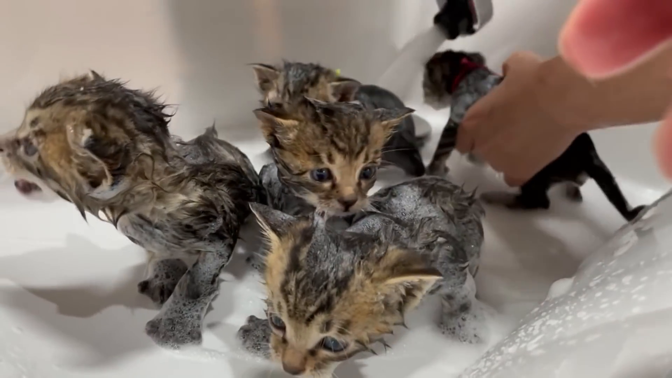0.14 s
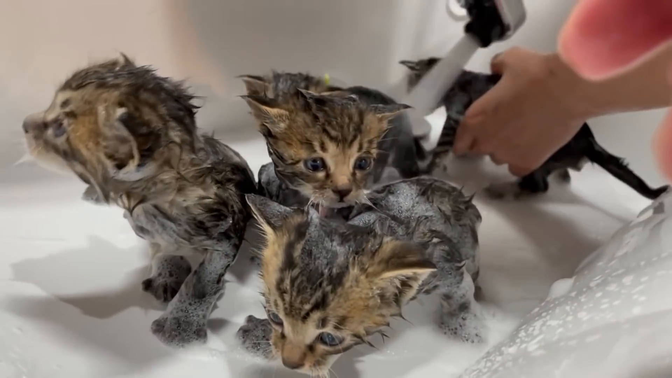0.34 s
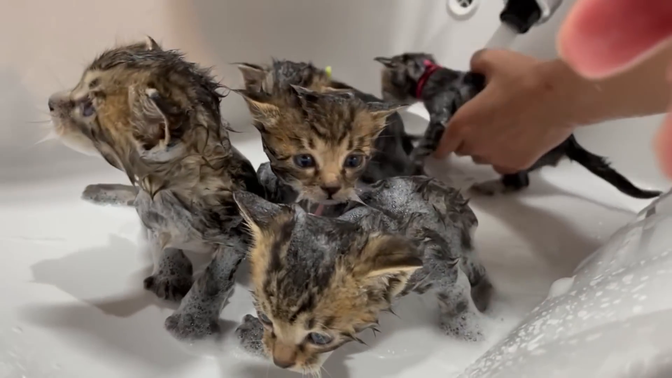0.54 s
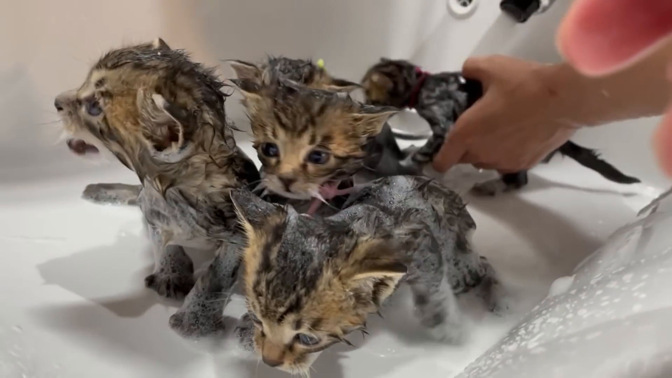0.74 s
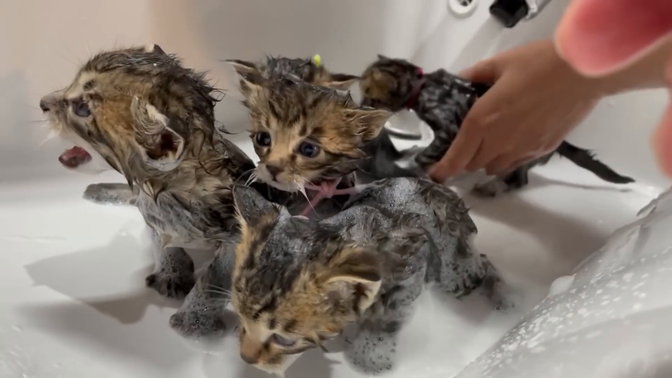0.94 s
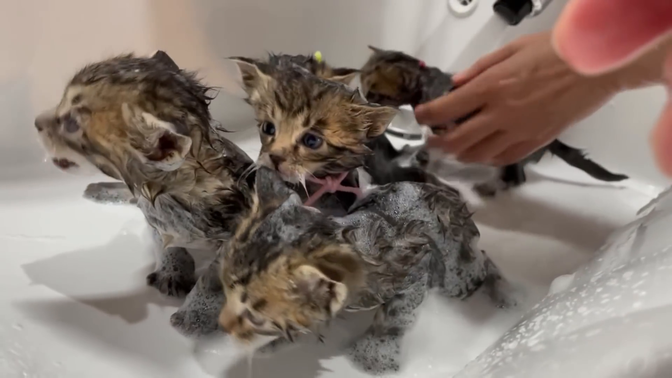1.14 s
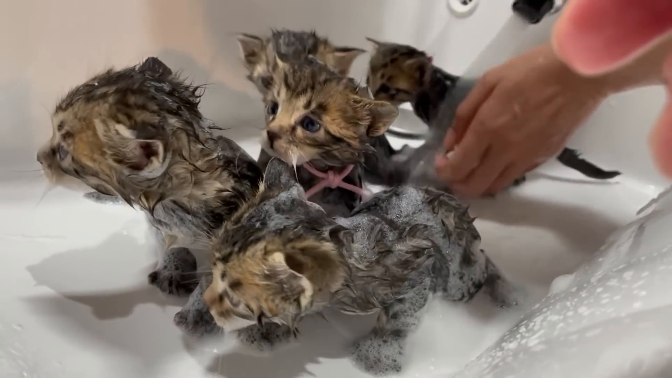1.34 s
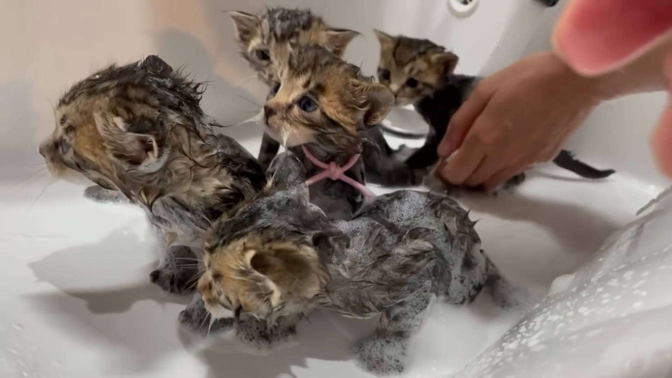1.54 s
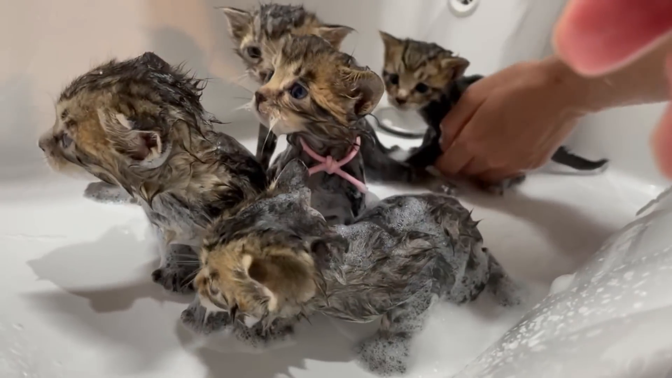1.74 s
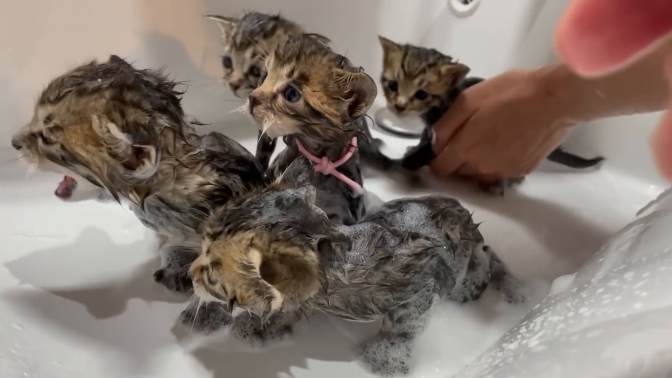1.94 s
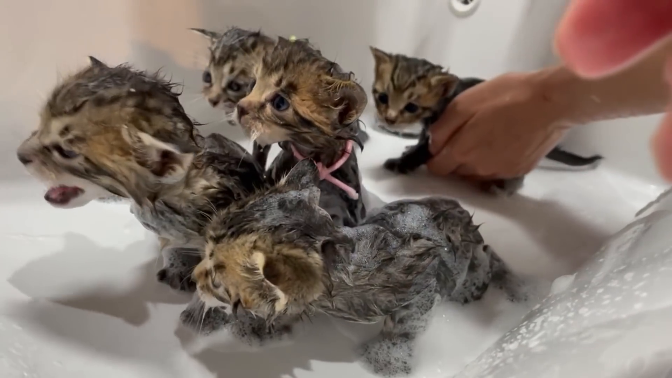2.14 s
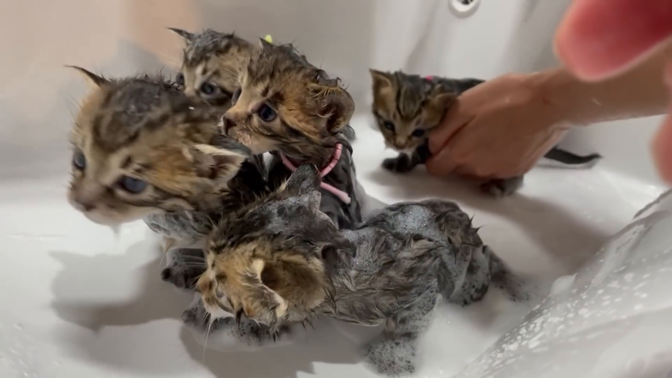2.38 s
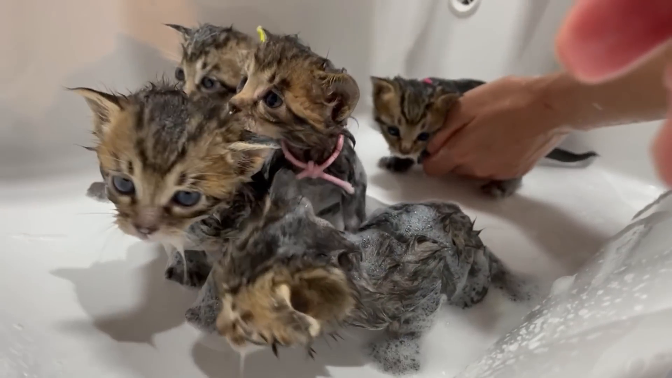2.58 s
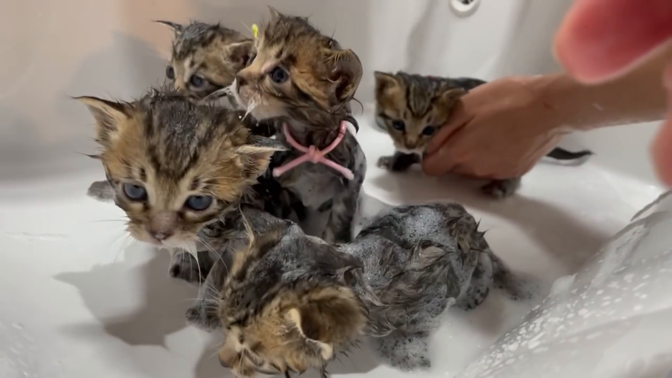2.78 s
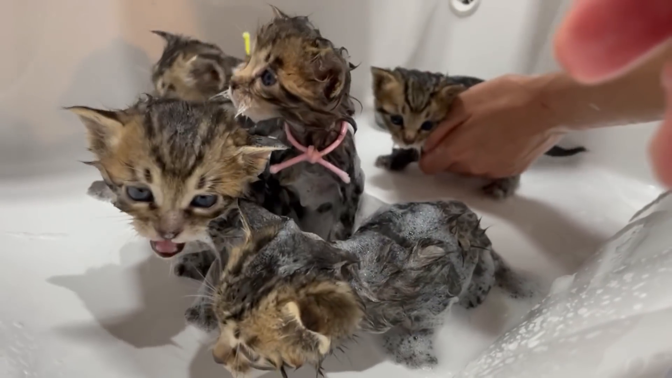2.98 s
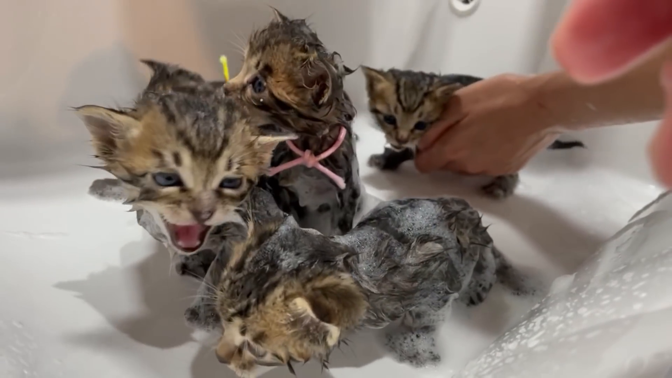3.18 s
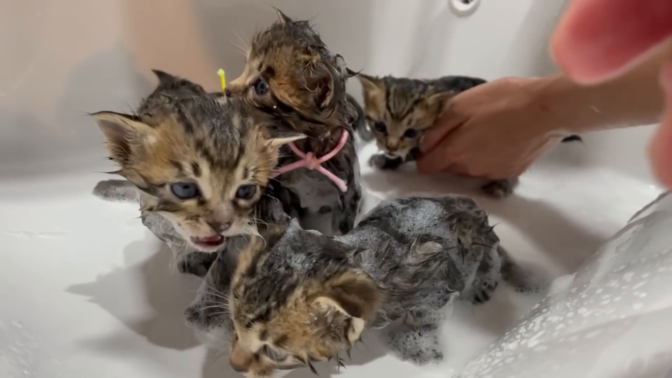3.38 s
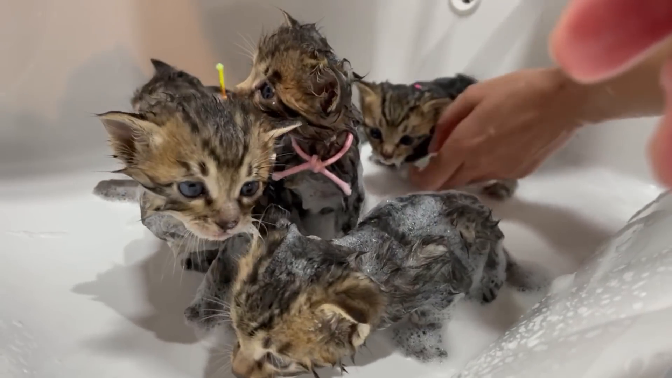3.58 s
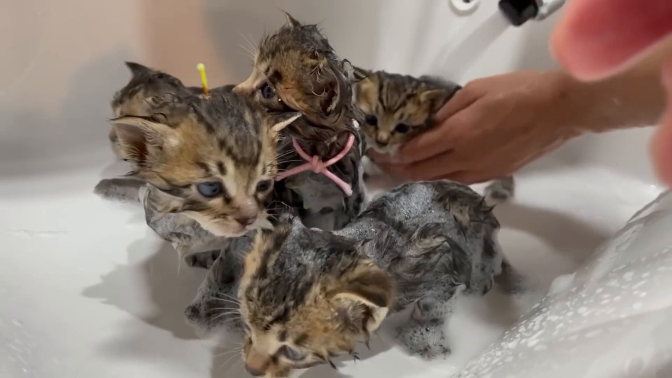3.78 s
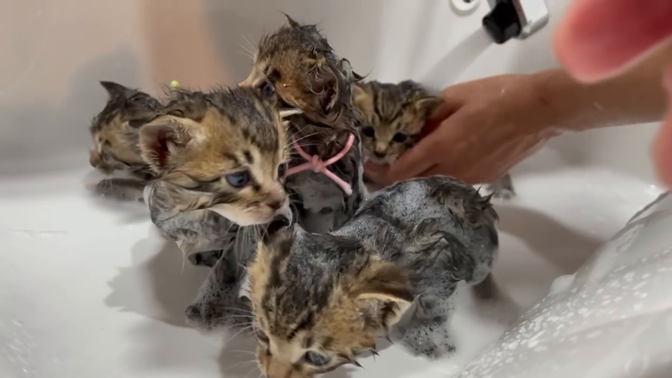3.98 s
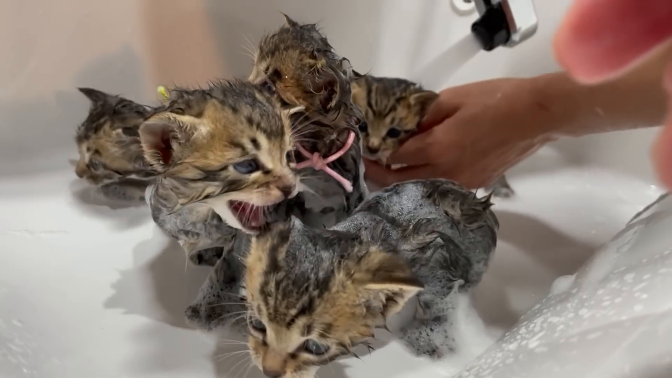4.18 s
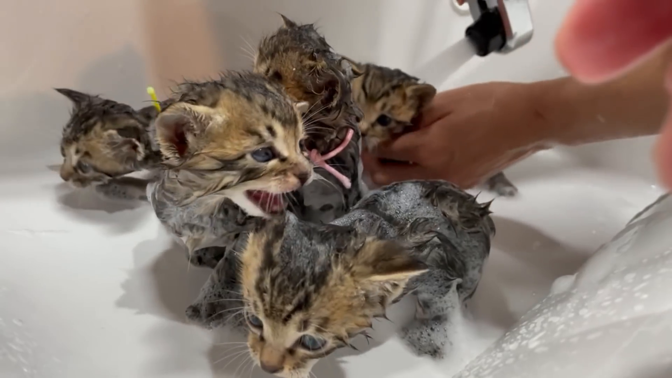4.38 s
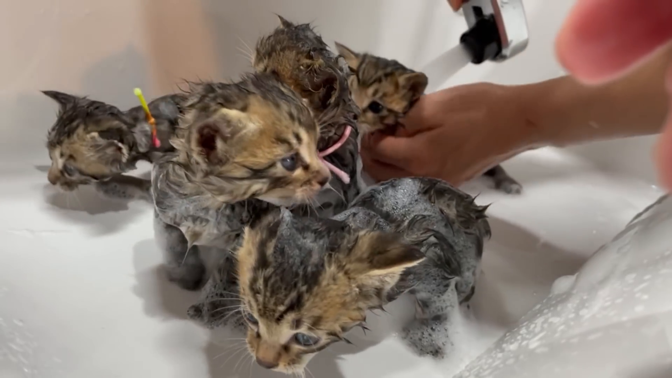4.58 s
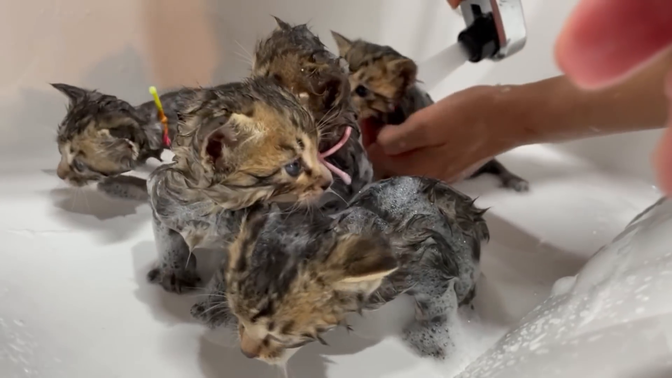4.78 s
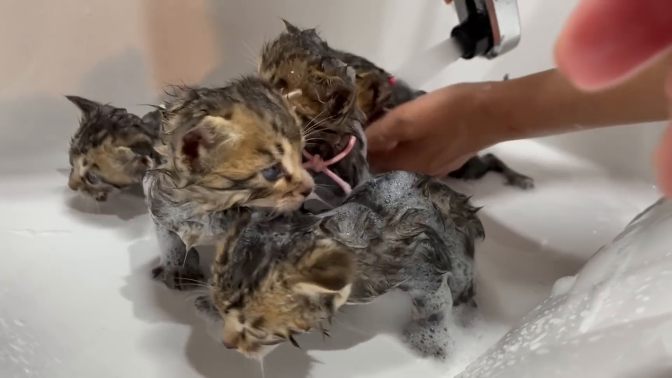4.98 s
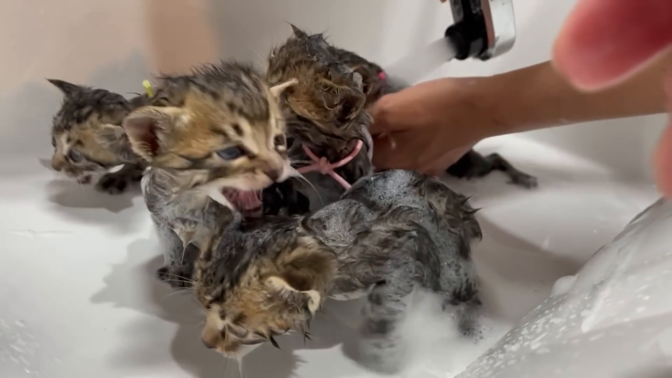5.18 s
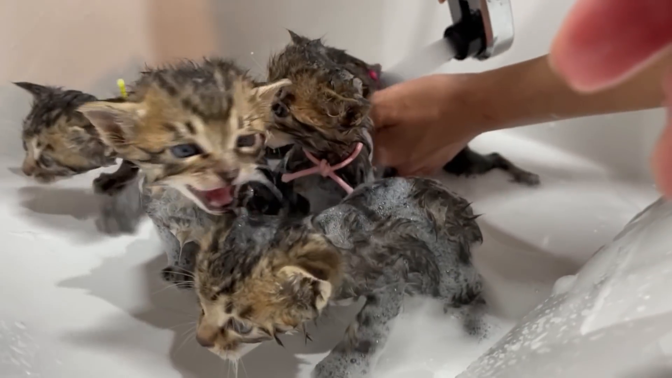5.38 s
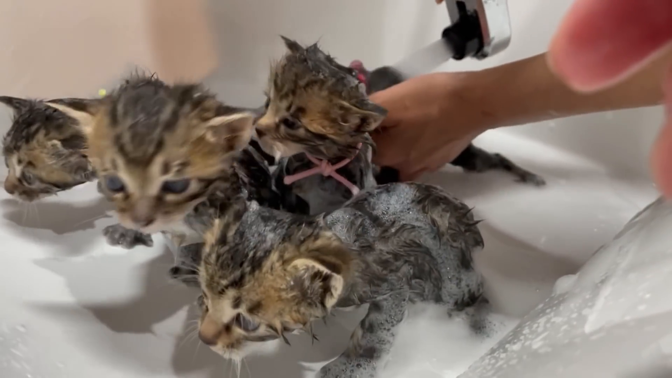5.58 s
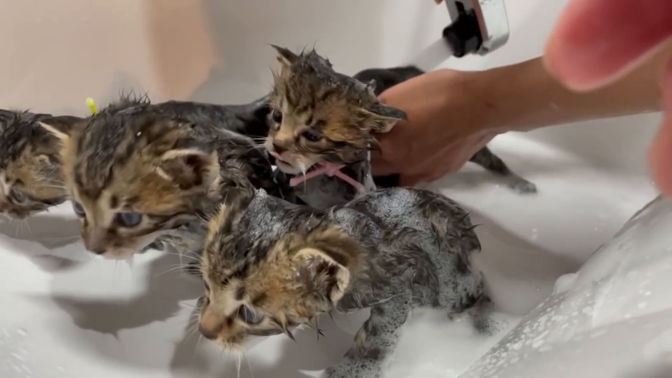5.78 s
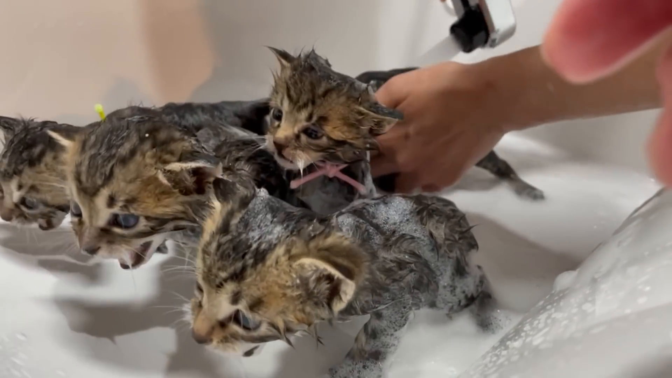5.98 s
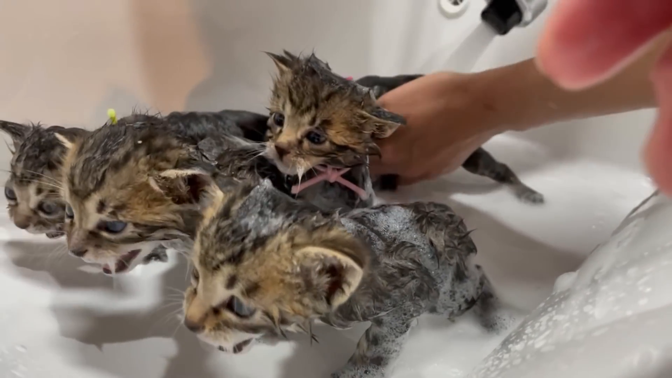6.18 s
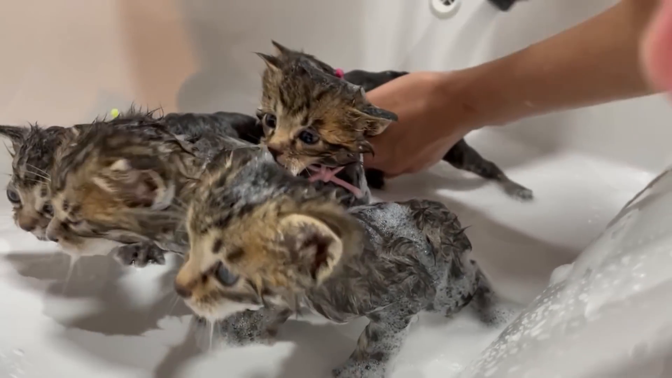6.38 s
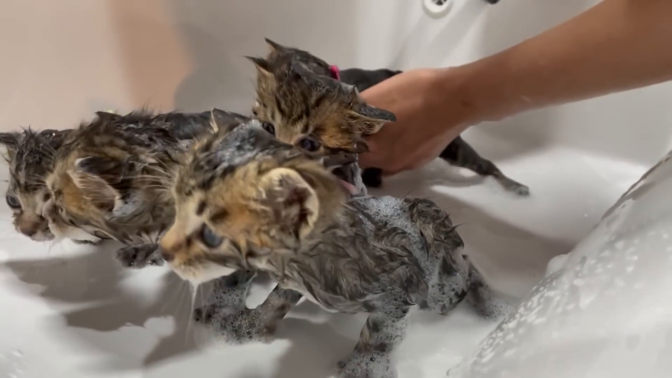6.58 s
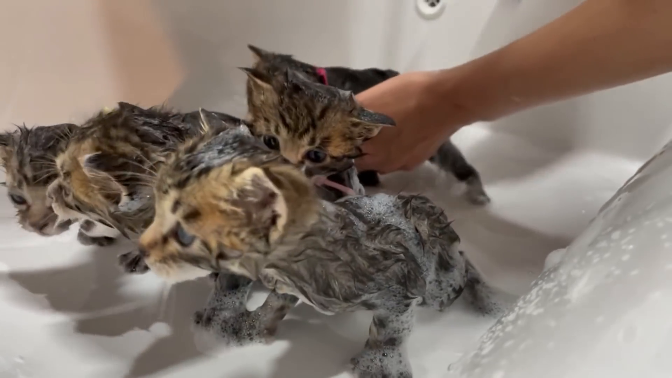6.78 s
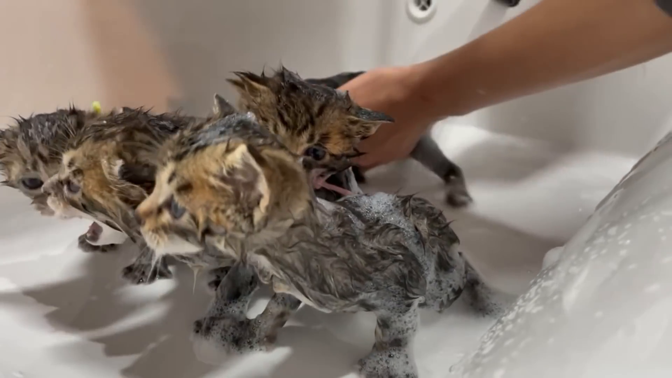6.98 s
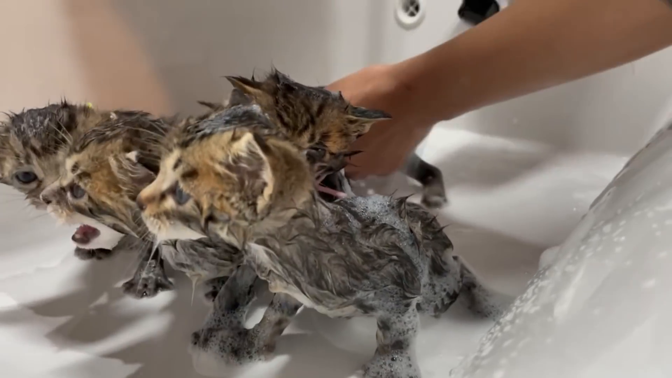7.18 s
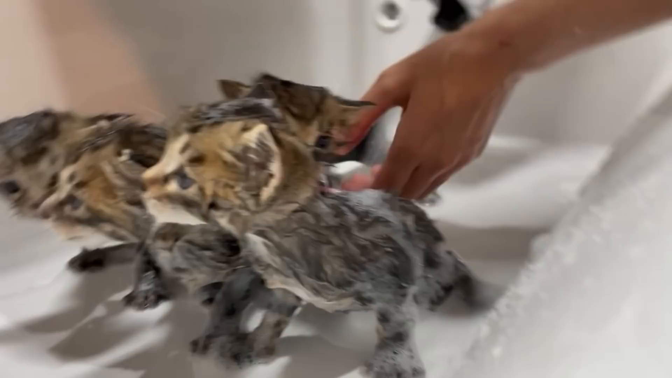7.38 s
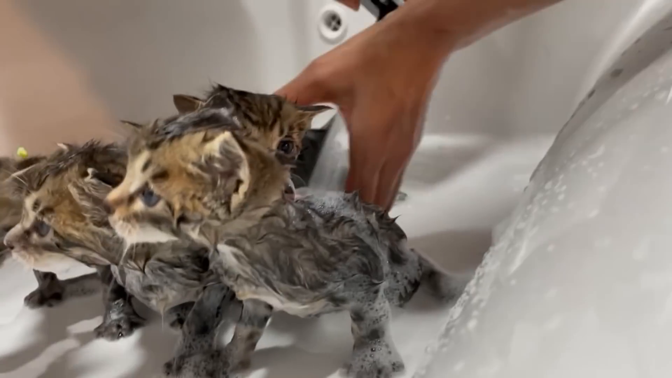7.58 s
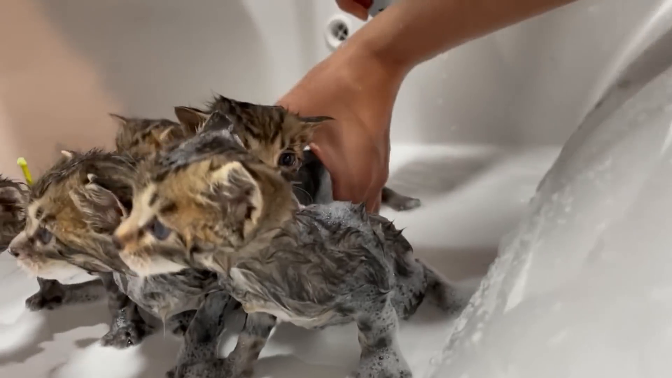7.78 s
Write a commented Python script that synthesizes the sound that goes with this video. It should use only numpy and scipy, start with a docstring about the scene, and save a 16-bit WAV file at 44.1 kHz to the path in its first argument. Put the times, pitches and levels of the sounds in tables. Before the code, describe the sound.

In a small bathroom, thin piercing kitten voices overlap: pure soft whines, brighter open-mouthed mews and four harsh yells with raspy strain and a breaking finish. The cries sit near and slightly left, with weak tub reflections. Quiet swishes of wet fur and tiny paw squishes appear in gaps, over low room air, unsteady hum and light microphone hiss. The final mew gives way to near quiet.

```python
"""In a bathroom, wet kittens cry over one another while they are washed in a tub, close to a hand-held microphone.
Whines and mews are arches of pitch: whines are nearly pure, mews brighten as their overtones swell.
Yells follow drawn courses of pitch and harmonics and break near the end; strained cries split into a rasp.
Weak echoes from the tub walls and a short room tail answer; shaped noise makes wet fur, paws, air and hiss.
Narrow, unsteady bands make the hum."""
import sys
import numpy as np
from scipy import signal
from scipy.fft import rfft, irfft, next_fast_len
from scipy.io import wavfile
from scipy.ndimage import uniform_filter1d, map_coordinates

SR = 44100
rng = np.random.default_rng(int(sys.argv[2]) if len(sys.argv) > 2 else 0)


def waveform_to_disk(signal):
    """Save audio, clipped to [-1, 1], as 16-bit WAV at the path in sys.argv[1]."""
    frames = np.transpose(np.atleast_2d(signal))
    scaled = np.clip(frames, -1, 1) * 32767
    samples = np.round(scaled).astype(np.int16)
    wavfile.write(sys.argv[1], SR, samples)


N = 346185  # length [samples]
TOP_HZ = 15800  # band limit of the harmonics and of the final mix


def amp(db):
    """Amplitude factor of a level in dB."""
    return 10 ** (np.asarray(db) / 20)


def unit(x):
    """x scaled to rms 1."""
    return x / np.sqrt(np.mean(abs(x) ** 2) + 1e-20)


def along(points, hz):
    """Curve of (frequency [Hz], value) points, read on a log frequency axis."""
    f, v = np.transpose(points)
    return np.interp(np.log(hz + 1), np.log(f + 1), v)


def wobble(rate, size):
    """Smooth random curve with rate knots a second."""
    knots = rng.standard_normal(int(size * rate / SR) + 4)
    return map_coordinates(knots, [np.arange(size) * rate / SR])


def flutter(rate, size):
    """Random unsteadiness of both strength and phase, as a complex curve of rms 1."""
    return unit(wobble(rate, size) + 1j * wobble(rate, size))


def filtered(x, response):
    """x shaped by a response of frequency."""
    m = next_fast_len(x.shape[-1] + 8192)
    spectrum = rfft(x, m) * response(np.fft.rfftfreq(m, 1 / SR))
    return irfft(spectrum, m)[..., :x.shape[-1]]


def gate(t, start, end, edge):
    """1 from start to end, with ramps just outside."""
    return np.clip(1 + np.minimum(t - start, end - t) / edge, 0, 1)


def add(out, x, start):
    """Mix a stereo sound in at a time in seconds."""
    first = round(start * SR)
    x = x[:, max(-first, 0):N - first]
    out[:, max(first, 0):][:, :x.shape[1]] += x


# Colour of the room air: (frequency [Hz], relative density [dB per Hz])
AIR_COLOUR = [(25, -11), (185, 0), (252, -10), (444, -4), (1250, -15), (2540, -21.5), (7000, -18),
              (9100, -63), (15400, -120)]
# Stereo likeness of the air: (frequency [Hz], left-right likeness [-1 to 1], negatives play as 0)
AIR_LIKENESS = [(60, 0.99), (240, 0.85), (950, 0.17), (3770, -0.22), (15000, 1)]
# Colour of the microphone hiss: (frequency [Hz], relative density [dB per Hz])
HISS_COLOUR = [(4000, -10), (6500, -2), (8500, -3), (10500, 4), (15500, -4)]
# Bands of the hum: (frequency [Hz], level [dB], width [Hz], left-right difference [dB])
HUM_BANDS = [(122, -63.5, 1.8, -2.5), (201.5, -62.5, 24, -3), (443, -61.5, 12, -5),
             (3044, -70.5, 180, -6.5)]


def background(air_db=-55, hiss_db=-58.0):
    """Steady room noise and microphone hiss are shaped noise; the hum is sines with random flutter."""
    def spread(hz):
        angle = np.arccos(np.clip(along(AIR_LIKENESS, hz), 0, 1)) / 2
        return amp(along(AIR_COLOUR, hz)) * [np.cos(angle), np.sin(angle)]

    mid, side = filtered(rng.standard_normal((2, N)), spread)
    air = unit(np.array([mid + side, mid - side])) * amp(air_db)
    hiss = filtered(rng.standard_normal((2, N)), lambda hz: amp(along(HISS_COLOUR, hz)))
    hiss = unit(hiss) * amp(hiss_db)
    t = np.arange(N) / SR
    hum = np.zeros((2, N))
    for hz, db, width, pan_db in HUM_BANDS:
        band = unit((flutter(2 * width, N) * np.exp(2j * np.pi * hz * t)).real)
        hum += amp([[db + pan_db / 2], [db - pan_db / 2]]) * band
    return air + hiss + hum


def unsteady(pitch, waver=0.00274, jitter=0.00472):
    """Phase of vocal folds that never hold quite still: slow, middling and fast pitch wobbles."""
    size = len(pitch)
    tremble = .003 * wobble(500, size)
    wander = waver * wobble(25.3, size) + jitter * wobble(90.9, size) + tremble
    return 2 * np.pi * np.cumsum(pitch * (1 + wander)) / SR


def swell(age, length, peak, shape):
    """Level in dB of a part that rises to its peak and fades to the end of the call."""
    (db, peak_s, fade_db), (rise_db, rise_power, fade_power) = peak, shape
    rising = np.clip(1 - age / peak_s, 0, 1)
    fading = np.clip((age - peak_s) / max(length - peak_s, 1 / 100), 0, 1)
    return db - rise_db * rising ** rise_power - fade_db * fading ** fade_power


RISE_POWER = 2.5  # the pitch shoots up, then rounds off into its top
SAG_POWER = 1.7  # how long the pitch holds before it sags
SCOOP_WAVER = 0.0179  # share by which the pitch wobbles at the start of its climb
# Catches in a mew, where the pitch skips for a moment and the octave changes level with it:
# (start of the mew [s], time [s], half length [s], skip [Hz], octave flare [dB])
CATCHES = [ (1.68, 1.772, .022, 91, -11.5), (1.68, 1.834, 0.018, -61.5, 14), (2.94, 3.061, 0.022, 70, 3),
           (2.94, 3.089, 0.0081, -65.5, 3.5), (3.94, 4.099, 0.0136, -59.5, 13.5),
           (4.89, 4.937, 0.0069, 26, 20.5), (6.78, 6.903, 0.015, -21, 3), ]


def larynx(arch, peaks, shapes):
    """Times, pitch, phase and gains of a call: pitch shoots up, sags as the air runs out and drops at the end."""
    start, length, rise_s, fall_s, from_hz, top_hz, sag_hz, end_hz = arch
    t = start + np.arange(-SR // 100, int((length + 1 / 100) * SR)) / SR
    age = np.clip(t - start, 0, length)
    climb_left = np.clip(1 - age / rise_s, 0, 1)
    tiring = np.clip((age - rise_s) / (length - rise_s), 0, 1)
    pitch = top_hz - (top_hz - from_hz) * climb_left ** RISE_POWER
    pitch = pitch - sag_hz * np.sin(np.pi / 2 * tiring) ** SAG_POWER
    pitch = pitch + (end_hz - pitch) * np.exp((age - length) / fall_s)
    levels = [swell(age, length, peak, shape) for peak, shape in zip(peaks, shapes)]
    for cry_s, at_s, half_s, skip_hz, flare_db in CATCHES:
        if len(levels) > 1 and abs(cry_s - start) < 1 / 20:
            catch = np.exp(-((t - at_s) / half_s) ** 2)
            pitch = pitch + skip_hz * catch
            levels[1] = levels[1] + flare_db * catch
    pitch = pitch * (1 + SCOOP_WAVER * climb_left * wobble(70.7, len(t)))
    gains = amp(levels) * gate(t, start, start + length, 1 / 100)
    return t, pitch, unsteady(pitch), gains


SHEEN_HZ, SHEEN_WIDTH_HZ = 11280, 900  # a high resonance of the tiny mouth


def sheen(hz):
    """Gain of an overtone as it sweeps through the mouth's high resonance."""
    return 1 / (1 + ((hz - SHEEN_HZ) / SHEEN_WIDTH_HZ) ** 2)


WALL_DB = -19  # all wall copies together, against the direct sound


def in_tub(x, pan_db, count=10):
    """A sound at one spot: the direct sound, then weak copies from the nearby enamel walls."""
    paths = np.zeros((2, SR // 40))
    delays = rng.integers(SR // 700, SR // 50, count)  # about 1.4 to 20 ms
    bounces = unit(rng.normal(size=count) + rng.normal(size=(2, count)))
    paths[:, delays] = amp(WALL_DB) * bounces / np.sqrt(count)
    paths[:, 0] = 1
    sides = amp([[pan_db / 2], [-pan_db / 2]])
    return signal.fftconvolve(x[None], paths, axes=1) * sides / sides.mean()


# Swells of fundamental, octave and upper overtones; a whine plays the first row only:
# (rise [dB], power of the rise, power of the fade)
CALL_SWELLS = [(19.6, 3.83, 1.26), (30.5, 3.18, 0.77), (18.8, 2.43, 0.81)]
# Harmonics of a whine: (multiple of the pitch, relative level [dB])
WHINE_HARMONICS = [(1, -1), (2, -25)]
# Soft whines, levels before the voice gain: (start [s], length [s], rise [s], fall [s],
#   from [Hz], top [Hz], sag [Hz], end [Hz], peak level [dB], time to peak [s], fade by the end [dB])
WHINES = [ (-.2, 0.76, 0.047, 0.065, 900, 1757, 514, 1080, -28, 0.034, 19.3),
          (-.2, .465, .12, .05, 900, 1505, 110, 980, -43, .36, 10),
          (0.811, 0.4, 0.1, 0.04, 1300, 1572, 214.7, 969, -41.5, 0.15, 12.6),
          (2.982, .863, 0.16, 0.089, 1040, 1408, 236, 960, -47.5, 0.16, 10),
          (5.93, 0.5, 0.18, 0.088, 1066, 1660, 288.5, 819, -43, 0.25, 7.6), ]


def whine(row, pan_db=-5.5, shimmer_db=1.95, rough=0.056, sheen_db=-31):
    """A soft call: nearly all fundamental, with a weak octave and a trace of sheen."""
    t, pitch, phase, (gain,) = larynx(row[:8], [row[8:]], CALL_SWELLS)
    tone = sum(amp(db) * np.exp(1j * k * phase) for k, db in WHINE_HARMONICS)
    high = sum(sheen(k * pitch) * np.exp(1j * k * phase) for k in (7, 8))
    tone = tone + amp(sheen_db) * high
    tone = tone * amp(shimmer_db * wobble(45.66, len(t))) * (1 + rough * flutter(460, len(t)))
    return in_tub(np.sqrt(2) * gain * tone.imag, pan_db), t[0]


# Decay of the room: (frequency [Hz], time to fall 60 dB [s])
ROOM_DECAY = [(500, 0.07), (3000, 0.62), (12000, 0.009)]


def bathroom(x):
    """The room's short tail: noise whose bands die away at their own rates."""
    hz, t, z = signal.stft(rng.standard_normal((2, SR // 2)), SR, nperseg=256)
    decay = amp(-60 * t / along(ROOM_DECAY, hz)[:, None])
    tail = signal.istft(z * decay, SR, nperseg=256)[1]
    return signal.fftconvolve(x.mean(axis=0)[None], tail / np.linalg.norm(tail[0]), axes=1)[:, :N]


# Kinds of split: name: (cycles per repeat, roughness [0-1])
SPLITS = {"halves": (2, .06), "thirds": (3, .09), "quarters": (4, .18), "sixths": (6, .24)}
# Mouth resonances that colour a rasp: (frequency [Hz], relative level [dB])
RASP_MOUTH = [(500, -42), (900, -25), (2100, -25), (2700, -10), (3150, -10), (3450, 0), (3750, 0),
              (4400, -21), (4850, -11), (5900, -11), (7000, -30)]


def rasp(pitch, phase, split, bright_db):
    """Strained folds repeat only every few cycles: the mouth rings with lines between the harmonics (rms 1)."""
    cycles, roughness = SPLITS[split]
    orders = np.array([j / cycles for j in range(1, 6 * cycles) if j % cycles])[:, None]
    hz = orders * pitch
    shape = amp(along(RASP_MOUTH, hz) + bright_db * np.log2(np.maximum(hz, 2500)))
    shape = shape / np.linalg.norm(shape, axis=0)
    trembling = np.array([np.exp(2j * np.pi * rng.random()) + 2 * roughness * flutter(162, len(pitch))
                          for _ in orders])
    lines = shape * trembling * np.exp(1j * orders * phase)
    return unit(lines.imag.sum(axis=0))


# Strained stretches of the mew or yell that began last, levels before the voice gain:
# (from [s], to [s], kind of split, level between harmonics [dB], brightness [dB per octave])
RASPS = [ (.515, .592, "quarters", -43, 2), (.735, .8, "halves", -49, 2),
         (.825, .872, "quarters", -47, -16), (1.695, 1.73, "quarters", -54, -6),
         (1.984, 1.997, "thirds", -42, -45), (2.17, 2.24, "halves", -44, 18),
         (2.258, 2.295, "quarters", -49, 5), (3.083, 3.096, "quarters", -39, -18),
         (3.358, 3.372, "thirds", -38, -18), (3.376, 3.397, "sixths", -29, -18),
         (3.402, 3.455, "thirds", -31, -22), (3.478, 3.555, "halves", -43, -5),
         (5.833, 5.852, "quarters", -35, 0), (5.927, 5.98, "thirds", -33, 0),
         (5.985, 6.022, "thirds", -37, 0), (6.025, 6.105, "sixths", -38.5, -9),
         (6.8, 6.85, "quarters", -56, 0), (6.9, 6.935, "thirds", -58, -30), ]


def voiced(t, began, pitch, phase, gains, breathy=0.0081, slack=0.24, shimmer_db=1.83):
    """Harmonics of the vocal folds, roughened by strain."""
    starts = [row[0] for row in MEWS] + [course[0][0] for course, *_ in YELLS]
    voice = np.zeros(len(t))
    # slack folds at low pitch vibrate unevenly
    rough = breathy + slack * np.clip((950 - pitch) / 250, 0, 1)
    for start, end, split, db, bright_db in RASPS:
        if began == max(s for s in starts if s < end):
            strain = gate(t, start, end, (end - start) / 3) ** 2 * amp(2 * wobble(45, len(t)))
            on = strain > 0
            voice[on] += amp(db) * strain[on] * rasp(pitch[on], phase[on], split, bright_db)
            rough = rough + SPLITS[split][1] * strain
    for k, gain in enumerate(gains, 1):
        # higher harmonics wander more in strength, up to the fifth
        wander_db = min(k - 1, 4) * .7 * wobble(28, len(t))
        partial = np.exp(1j * k * phase) * (1 + rough * flutter(800, len(t))) / np.hypot(1, rough)
        level = gain * amp(wander_db + shimmer_db * wobble(99.44, len(t)))
        voice += np.sqrt(2) * level * partial.imag
    return voice


VOICE_PAN_DB = -4.5  # left against right, for mews and yells
YELL_DB, YELL_TREBLE_DB = 3, -1  # gain of a yell, further gain of its upper harmonics
YELL_WAVER = .012  # share by which the pitch wobbles, most at the start
SCOOP_DB, SCOOP_S = 9, 0.042  # the fundamental is stronger while the pitch scoops up
BREAK_S, BREAK_LOSS_DB, BREAK_ROUGH = .02, 16, .3  # a break: duration, treble lost, roughness that follows
BREATH_DB, RUSH_DB = -32, -19  # steady breath and opening rush, against the treble
# Wide-open mouth of a yell, colouring its treble: (frequency [Hz], relative level [dB])
GAPE = [(3400, 8.5), (4150, -6.5), (4900, 4.5), (5500, -1), (6500, -1.5), (8000, -29), (10500, -12),
        (15000, -28)]
# Courses of the yells, levels before the yell and voice gains:
# (time [s], pitch [Hz], octave level [dB], third harmonic level [dB], treble level [dB])
FIRST_YELL = [(0.5, 615, -47, -49, -66), (0.516, 754, -35.5, -41, -45), (0.535, 873, -39.5, -30, -32),
              (0.562, 1049, -44.5, -37.5, -36.5), (0.6, 1185, -35.5, -28.5, -36),
              (0.66, 1234, -36, -43, -38.5), (0.715, 1192, -28.5, -32, -46), (0.78, 1119, -39.5, -37, -49),
              (0.848, 1067, -39.5, -41, -59), (0.878, 1107, -44, -50.5, -47), (0.905, 1248, -40, -63, -61),
              (0.99, 1045, -64, -66, -66), (1.045, 835, -60.5, -58.5, -60)]
SECOND_YELL = [(2.03, 847, -63, -66, -78), (2.06, 1158, -47, -63, -58), (2.102, 1281, -49, -29, -37),
               (2.204, 1344, -50.5, -47.5, -41.5), (2.294, 1300, -47, -35.5, -46),
               (2.404, 1123, -42, -39.5, -49.5), (2.43, 1236, -43.5, -63, -54),
               (2.508, 1152, -58, -68, -61), (2.6, 755, -71, -83, -86)]
THIRD_YELL = [(3.245, 720, -66, -69, -83), (3.272, 946, -39, -52, -46), (3.29, 1080, -45, -18, -41.5),
              (3.309, 1181, -46, -24.5, -34.5), (3.34, 1251, -42, -20, -41), (3.387, 1312, -42.5, -27, -44),
              (3.47, 1258, -39, -31.5, -49), (3.619, 990, -57, -57, -55.5), (3.649, 973, -43, -66, -54.5),
              (3.677, 1086, -54.5, -64, -45), (3.731, 1022, -62.5, -72, -57), (3.78, 740, -65, -74, -67)]
FOURTH_YELL = [(5.812, 782, -54, -74, -83), (5.828, 885, -38, -27.5, -38.5), (5.854, 1186, -43, -26, -26.5),
               (5.875, 1264, -39.5, -29.5, -38), (5.926, 1370, -35, -24, -35.5),
               (5.955, 1366, -34.5, -24.5, -40), (5.995, 1398, -42.5, -30, -39),
               (6.094, 1314, -32.5, -38, -44.5), (6.22, 1094, -47, -47, -53.5),
               (6.288, 1032, -40.5, -54.5, -52), (6.316, 1214, -58, -69, -54), (6.44, 840, -66, -79, -64)]
# Yells that break into a light voice near the end:
# (course, brightness [dB per octave], time of the break [s], base level of the fundamental [dB])
YELLS = [(FIRST_YELL, -1.5, 0.863, -57), (SECOND_YELL, -17, 2.41, -61), (THIRD_YELL, -14, 3.655, -54.5),
         (FOURTH_YELL, -8.5, 6.3, -56)]


def yell(course, bright_db, break_s, first_db, treble_hz=4200, rush_s=0.14, dying_db=9):
    """A strained yell: a rush of air, then the octave and third harmonic take turns to lead."""
    s, *columns = np.transpose(course)
    t = np.arange(s[0] - 1 / 100, s[-1] + 1 / 100, 1 / SR)
    pitch, *levels = [uniform_filter1d(np.interp(t, s, c), SR // 200) for c in columns]
    climbing = np.exp(-((t - s[0]) / (2 * SCOOP_S)) ** 2)
    pitch = pitch * (1 + YELL_WAVER * climbing * wobble(130, len(t)))
    sounding = amp(YELL_DB) * gate(t, s[0], s[-1], 1 / 100)
    second, third, treble = amp(levels) * sounding
    hz = np.arange(4, 12)[:, None] * pitch
    shape = amp(along(GAPE, hz) + bright_db * np.log2(np.minimum(hz, 6500) / pitch))
    # the treble level is set by the harmonics above treble_hz
    shape = shape / np.linalg.norm(shape / (1 + (treble_hz / hz) ** 20), axis=0)
    broken = gate(t, break_s + BREAK_S / 2, np.inf, BREAK_S)
    upper = amp(YELL_TREBLE_DB - BREAK_LOSS_DB * broken) * treble * shape
    scoop_db = SCOOP_DB * np.exp(-((t - s[0]) / SCOOP_S) ** 2)
    dying = np.clip((t - break_s) / (s[-1] - break_s), 0, 1)
    first = amp(first_db + scoop_db - dying_db * dying) * sounding
    voice = voiced(t, s[0], pitch, unsteady(pitch), [first, second, third, *upper],
                   breathy=0.011 + BREAK_ROUGH * broken)
    hiss = filtered(rng.standard_normal(len(t)), lambda f: amp(along(GAPE, f) / 2) * f / (f + 2500))
    air = amp(BREATH_DB) + amp(RUSH_DB) * np.exp((s[0] - t) / rush_s)
    return in_tub(voice + air * treble * unit(hiss), VOICE_PAN_DB), t[0]


ONSET_DB, ONSET_S = 6.5, 0.0034  # the overtones come in a moment after the folds start to swing
# Throat and mouth, colouring the upper overtones: (frequency [Hz], relative level [dB])
THROAT = [(2000, 3), (3800, -6), (5400, -4.5), (6300, -6), (8000, -37.5), (10500, -13.5), (15000, -20)]
# Open-mouthed mews, levels before the voice gain: (start [s], length [s], rise [s], fall [s],
#   from [Hz], top [Hz], sag [Hz], end [Hz],
#   then for fundamental, octave and upper overtones: peak level [dB], time to peak [s], fade by the end [dB],
#   brightness [dB per octave])
MEWS = [ (1.68, 0.59, 0.1, 0.099, 746, 1718, 104, 802, -31.5, 0.25, 20, -28.5, 0.15, 67, -41.5, 0.16, 95, -17),
        (1.791, 0.52, 0.1, 0.022, 938, 1547, 260, 890, -39, 0.26, 36, -33, 0.12, 59, -43.5, 0.09, 52, -27),
        (2.94, 0.51, 0.11, 0.15, 720, 1572, 33, 1262, -33, 0.24, 24, -25.5, 0.18, 36, -41.5, 0.07, 25.5, -14.5),
        (3.945, 0.48, 0.16, 0.079, 612, 1751, 113, 754, -36, 0.31, 16.5, -34.5, 0.18, 32, -49, 0.13, 23, 0),
        (4.101, 0.42, 0.13, 0.04, 1186, 1472, 97, 784, -41.5, 0.26, 27, -31, 0.19, 43, -52, 0.1, 17, 8),
        (4.885, .37, .13, 0.064, 788, 1393, 18, 961, -55, 0.0063, 13, -38.5, 0.2, 15.6, -47.5, 0.2, 20, -5),
        (5.086, 0.41, 0.13, 0.033, 952, 1464, 112, 862, -38.5, 0.25, 22.4, -28, 0.24, 35.7, -47, 0.073, 26, -16),
        (6.779, .59, .11, .075, 803, 1529, 108, 900, -38, .29, 26, -38, .15, 38, -46, .08, 32, -25), ]


def mew(row, sheen_db=-32):
    """An arch of pitch whose overtones swell and fade as the mouth opens and shuts."""
    arch, peaks, bright_db = row[:8], np.reshape(row[8:17], (3, 3)), row[17]
    t, pitch, phase, (first, second, upper) = larynx(arch, peaks, CALL_SWELLS)
    starting = amp(-ONSET_DB * np.exp(-(np.maximum(t - arch[0], 0) / ONSET_S) ** 2))
    second, upper = second * starting, upper * starting
    hz = np.arange(3, 11)[:, None] * pitch
    shape = amp(along(THROAT, hz) + bright_db * np.log2(np.minimum(hz, 6500) / pitch)) * (hz < TOP_HZ)
    coloured = upper * shape / np.linalg.norm(shape, axis=0)
    glint = np.hypot(first, second) * amp(sheen_db) * sheen(hz)
    gains = [first, second, *(coloured + glint)]
    return in_tub(voiced(t, arch[0], pitch, phase, gains), VOICE_PAN_DB), t[0]


# Extra colour of the voices at the left microphone: (frequency [Hz], gain [dB])
LEFT_TREBLE = [(5500, -1.5), (9000, 5.5)]


def kittens(lag_s=3.2e-5):
    """All calls together; they reach the right microphone a moment before the left."""
    out = np.zeros((2, N))
    whines = [whine(row) for row in WHINES]
    yells = [yell(*row) for row in YELLS]
    mews = [mew(row) for row in MEWS]
    for sound, start in whines + yells + mews:
        add(out, sound, start)
    out[0] = filtered(out[0], lambda hz: amp(along(LEFT_TREBLE, hz)))
    return filtered(out, lambda hz: np.exp(1j * np.pi * hz * lag_s * np.array([[-1], [1]])))


# Colour of rubbed wet fur: (frequency [Hz], relative level [dB])
FUR_COLOUR = [(1500, -57), (3500, -13), (4700, 5.5), (6000, -4.5), (12000, -11)]
# Strokes over wet fur: (middle [s], length [s], level [dB])
RUBS = [(2.78, .14, -59), (4.77, .24, -54.5)]


def rubs(crackle_db=3):
    """A hand strokes wet fur: a soft swish of noise with a grainy level."""
    t = np.arange(N) / SR
    strokes = sum(amp(db) * np.exp(-(2 * (t - s) / length) ** 2) for s, length, db in RUBS)
    grains = rng.standard_normal((2, N)) * amp(crackle_db * wobble(380, N))
    return strokes * unit(filtered(grains, lambda hz: amp(along(FUR_COLOUR, hz))))


# Colour of a wet squish: (frequency [Hz], relative level [dB])
SQUISH_COLOUR = [(500, -15), (2000, 21), (6000, 11), (15000, -57)]
# Wet touches of paws and fur: (time [s], level before the trim [dB], brightness [dB per octave])
TOUCHES = [(2.7483, -44, 15), (5.45, -44, -23), (5.671, -44.5, -19), (6.4902, -43.5, 18), (6.6216, -51, 14),
           (7.291, -49, -1), (7.3692, -46.5, 10)]


def touches(trim_db=-8, t60=0.2, crackle_db=5):
    """Wet fur and paws: short puffs of crackly noise that die away at once."""
    out, t = np.zeros((2, N)), np.arange(SR // 4) / SR
    for s, db, bright_db in TOUCHES:
        grains = rng.standard_normal(len(t)) * amp(crackle_db * wobble(540, len(t)))
        puff = unit(filtered(grains, lambda hz: amp(
            along(SQUISH_COLOUR, hz) + bright_db * np.log2(np.maximum(hz, 2000)))))
        add(out, in_tub(puff * amp(db + trim_db - 60 * t / t60), 0), s)
    return out


def scene(voices_db=2, tail_db=-19):
    """Voices, rubs and touches with their room tail, over the background."""
    near = amp(voices_db) * kittens() + rubs() + touches()
    return near + amp(tail_db) * bathroom(near) + background()


def record(dry, settle_s=0.14, knee_db=-27, squeeze=0.32):
    """A slow gain control backs off after loud cries; nothing is kept above the band limit."""
    step = 1 / (settle_s * SR)
    power = signal.lfilter([step], [1, step - 1], np.mean(dry ** 2, axis=0))
    gain = (1 + power / amp(knee_db) ** 2) ** -squeeze
    return filtered(dry * gain, lambda hz: hz < TOP_HZ)


dry = scene()
out = record(dry)
waveform_to_disk(out)
```